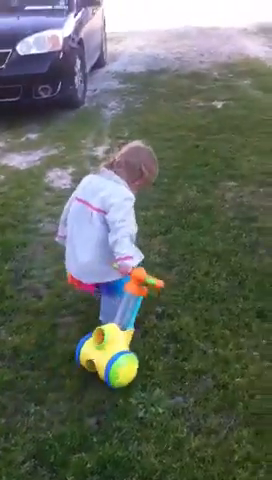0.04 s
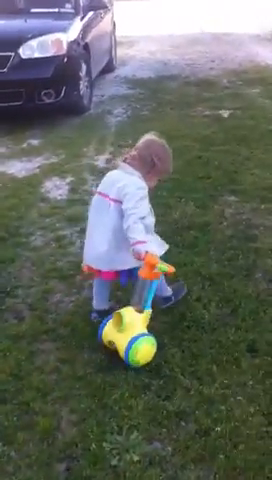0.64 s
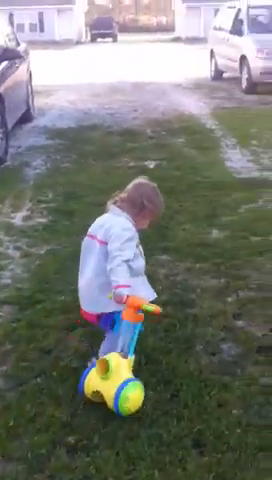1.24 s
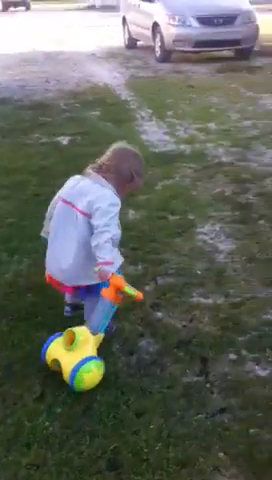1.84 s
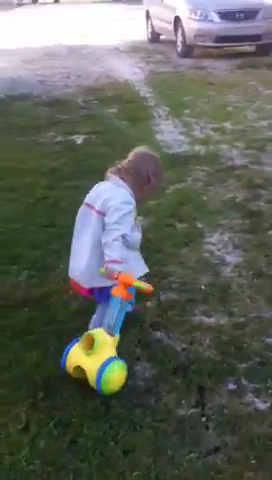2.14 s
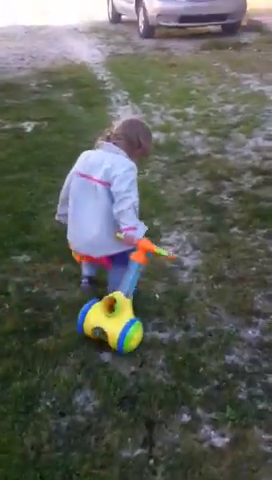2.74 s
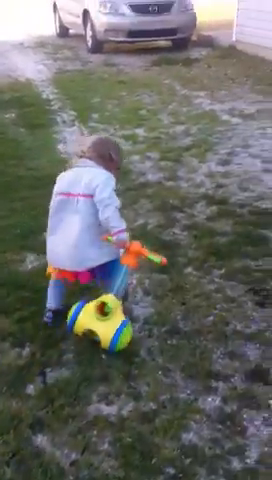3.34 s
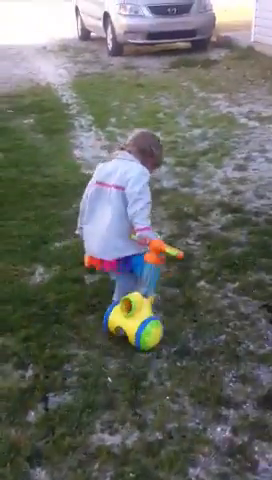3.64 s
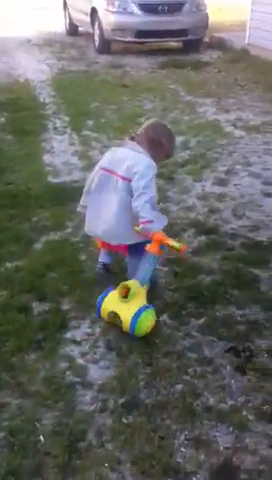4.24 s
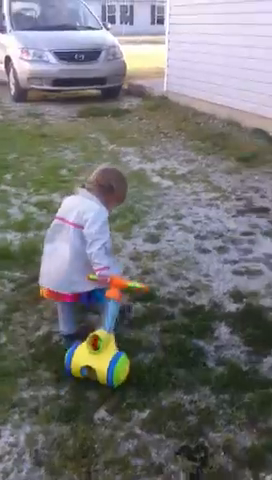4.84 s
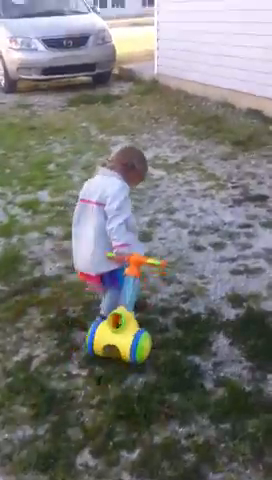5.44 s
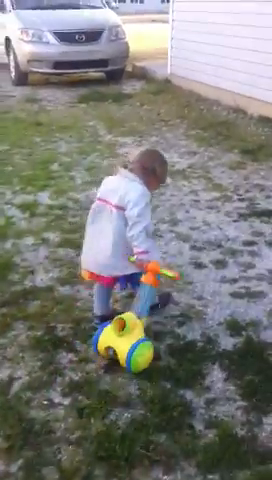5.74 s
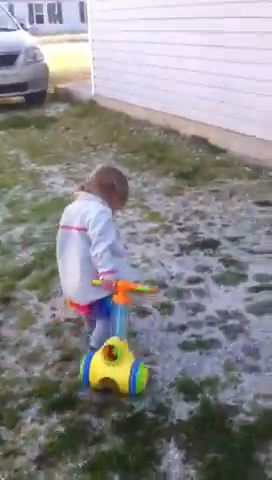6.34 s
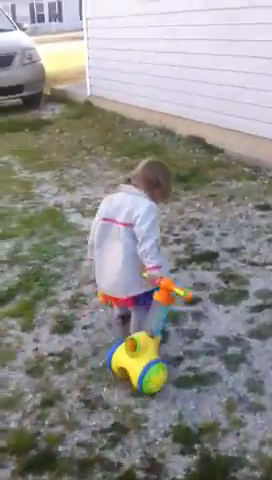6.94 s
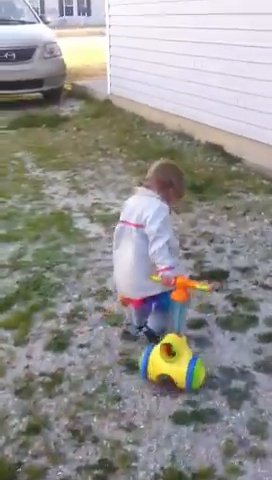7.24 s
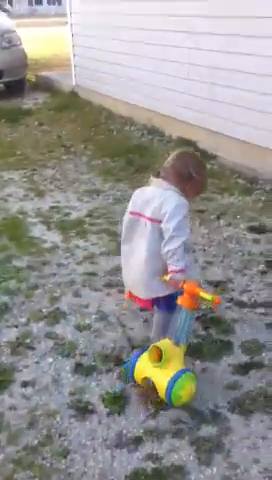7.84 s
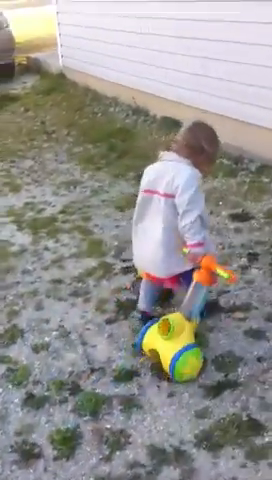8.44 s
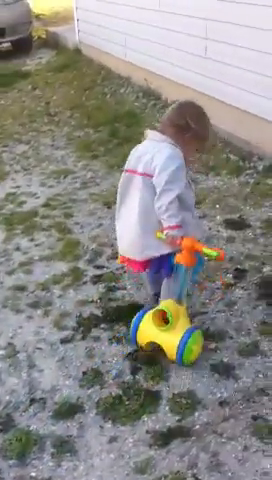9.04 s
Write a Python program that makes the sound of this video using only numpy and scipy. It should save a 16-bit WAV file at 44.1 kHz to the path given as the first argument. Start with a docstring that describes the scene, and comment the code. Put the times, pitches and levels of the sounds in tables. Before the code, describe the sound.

A toddler's plastic push toy rolls across a yard, a couple of metres away, its ratchet clicking for the whole nine seconds. The sharp clicks come in uneven runs, up to about twenty a second, and shift between bright and hollow as the drum turns. Brief pauses fall at about 0.7, 3.4, 4.1, 6.7, 7.6 and 8.5 seconds. Small, soft footsteps thud underneath, mostly in the first five seconds. A faint crackle of rolling grows slightly as grass gives way to gravel. Light crunches of stones are scattered throughout, clearest near 5.6, 6.5 and 8.2 seconds, and one pebble clacks on the plastic at about 6.6 seconds. The clicks gradually become a little hollower, with a stronger short echo from a house wall. A quiet, low drone of a distant town lies behind everything, with a hum swelling slightly around 3 seconds.

```python
"""Toddler pushing a clicking toy

A toddler rolls a plastic drum over grass and then gravel, a couple of metres away. A ratchet inside
(a catch snapping over a toothed wheel) clicks twelve times a turn, bright and hollow by turns as the
drum's open side comes round. A house wall and the yard echo it. Small feet thud, stones crunch and
one pebble clacks on the drum, over the quiet drone of a distant town."""
import sys
import numpy as np
from scipy import signal
from scipy.fft import rfft, irfft, next_fast_len
from scipy.io import wavfile
from scipy.ndimage import uniform_filter1d

SR = 44100
rng = np.random.default_rng(int(sys.argv[2]) if len(sys.argv) > 2 else 0)


def materialize(psi):
    """Save the field psi as 16-bit PCM at rate SR to the path in sys.argv[1].

    A 1-D psi becomes a single channel; in a 2-D psi each row is a channel.
    """
    bounded = np.clip(np.atleast_2d(psi).T, -1, 1)
    quanta = np.round(bounded * 32767).astype(np.int16)
    wavfile.write(sys.argv[1], SR, quanta)


N = 405279
TOP_HZ = 16000


def gain(db):
    return 10 ** (np.asarray(db) / 20)


def seconds(length):
    return np.arange(int(length * SR)) / SR


def unit_level(x):
    return x / np.sqrt(np.mean(x ** 2))


def fade(t, t60):
    """Die away by 60 dB every t60 seconds."""
    return np.exp(-np.log(1000) * t / t60)


def add(out, start_s, x):
    i = max(int(start_s * SR), 0)
    out[i:i + len(x)] += x[:max(len(out) - i, 0)]


def colour(x, tone):
    """Turn lows and highs up or down along a curve of (frequency [Hz], level [dB]) points."""
    hz, db = np.transpose(tone)
    size = next_fast_len(len(x))
    freqs = np.maximum(np.arange(size // 2 + 1) * SR / size, 1)
    curve = gain(np.interp(np.log(freqs), np.log(hz), db))
    return irfft(rfft(x, size) * curve, size)[:len(x)]


def band(x, lo_hz, hi_hz, order=2):
    return signal.sosfilt(signal.butter(order, [lo_hz, hi_hz], "band", fs=SR, output="sos"), x)


def wander(rate_hz):
    """A slow random drift, about 1 either way."""
    hold = int(SR / rate_hz)
    stairs = np.repeat(rng.standard_normal(N // hold + 1), hold)
    return unit_level(uniform_filter1d(uniform_filter1d(stairs, hold), hold)[:N])


# The tone of the distant town: (frequency [Hz], level [dB])
TOWN_TONE = [(25, -23.5), (55, -15), (75, -9.5), (105, 4), (200, 1), (450, -13), (2500, -19.5), (6000, -16),
             (10000, -25), (16000, -29)]
def town(drone_db=-61.7, hum_hz=182, hum_db=-62, hum_peak_s=2.92, hum_width_s=0.96):
    """A distant town: a low drone that wavers, a little hiss, and a hum that swells once and fades."""
    t = np.arange(N) / SR
    drone = unit_level(colour(rng.standard_normal(N), TOWN_TONE))
    drone *= gain(drone_db + np.linspace(1.3, -1.3, N) + wander(7.5))
    hum = unit_level(band(rng.standard_normal(N), hum_hz - 7, hum_hz + 7))
    swell = np.exp(-((t - hum_peak_s) / hum_width_s) ** 2)
    return drone + hum * gain(hum_db) * swell


def grains(size, density, spread_db, tone):
    """Tiny knocks at random moments, a few much bigger than the rest, high ones far more often than low."""
    out = 0
    for hz in 140 * 2. ** np.arange(7):
        strengths = gain(spread_db * np.minimum(rng.exponential(size=size), 4))
        happens = rng.random(size) < density * hz / 1000 / SR
        hits = happens * strengths * rng.choice([-1, 1], size)
        out = out + band(hits / np.sqrt(hz), hz, 2 * hz)
    return unit_level(colour(out, tone))


# The tone of the ground under the drum: (frequency [Hz], level [dB])
GROUND_TONE = [(200, 7.5), (480, -4.5), (750, 0.5), (2500, -11), (6000, -3.5), (12000, -33.5)]
def rolling(grass_db=-60.5, gravel_db=-56.5, creep=0.04, smooth_s=0.32):
    """Grass, later grit, crackles under the drum, louder when the ratchet's clicks come faster."""
    teeth = np.zeros(N)
    for start_s, _ in CLICKS:
        add(teeth, start_s, np.ones(1))
    window = int(smooth_s * SR)
    speed = unit_level(uniform_filter1d(uniform_filter1d(teeth, window), window // 2))
    grit = grains(N, density=1500, spread_db=4.2, tone=GROUND_TONE)
    return grit * (creep + speed) * gain(np.linspace(grass_db, gravel_db, N) + 1.2 * wander(13))


def struck(notes, levels_db, chatter_t60, hold_s, band_hz, detune=0, scatter_db=0, rise_s=.0002):
    """One ring for each level given: plastic chatters on plastic and sets a part's own notes ringing."""
    t, rings = seconds(.1), []
    for _ in levels_db:
        # some hits let go cleanly, others scrape a moment longer
        stretch = np.exp(0.23 * rng.standard_normal())
        chatter = rng.standard_normal(len(t)) * fade(np.maximum(t / stretch - hold_s, 0), chatter_t60)
        first_blow = 1 + gain(3) * fade(t, 0.018)
        chatter = chatter * first_blow * (1 - np.exp(-t / rise_s))
        ring = 0
        for k, (hz, width, db) in enumerate(notes):
            # each hit presses differently, so the notes can shift in pitch and strength
            shift, strength = rng.standard_normal(2)
            resonance = signal.iirpeak(hz * (1 + detune * shift), hz / width, fs=SR)
            note = signal.lfilter(*resonance, chatter)
            ring = ring + (-1) ** k * gain(db + scatter_db * strength) * note
        rings.append(ring)
    rings = band(np.array(rings), *band_hz)
    opening_level = rings[:, t < .014].std(axis=1, keepdims=True)
    return rings / opening_level * gain(levels_db)[:, None]


def turning(base_db, swing_db, cap_db, gravel_db, teeth=12, facing_tooth=6.6):
    """A part's level at each click: it swings once a turn, up to a cap, and shifts towards the gravel."""
    # 1 when the drum's open side faces the listener, -1 when it faces away
    facing = np.cos(2 * np.pi * (np.arange(len(CLICKS)) - facing_tooth) / teeth)
    progress = np.transpose(CLICKS)[0] * SR / N
    return base_db + np.minimum(swing_db * facing, cap_db) + gravel_db * (progress - .5)


# The notes of the thin tick, the catch, the wheel and the shell: (pitch [Hz], width [Hz], level [dB])
TICK_NOTES = [(9840, 490, 2.5), (11320, 960, 4), (13040, 3500, -5.5)]
CATCH_NOTES = [(5820, 330, -11), (6555, 340, -1.5), (6980, 290, -2), (7394, 250, 4.5), (8480, 350, -4.5),
               (9030, 520, -7.5)]
WHEEL_NOTES = [(4057, 235, -10.5), (4554, 144, -2), (4756, 138, 1), (5584, 260, -10)]
SHELL_NOTES = [(749, 75, -3.5), (864.3, 26, 8), (1292, 69, -4.5), (1420, 39, -0.5), (1616, 270, -5.5),
               (1820, 51, 0), (2075, 123, 1.5), (2913, 96, 1), (3088, 35.4, 8.5), (3656, 240, 3)]
# One click per tooth, in runs as the child shoves: (time [s], force against an average click [dB])
CLICKS = [(0.0507, 0.5), (0.1447, 1.5), (0.2722, -2.0), (0.4557, 1.0), (0.517, 0.5), (0.5801, -1.0),
          (0.6519, 0.5), (1.0125, 1.5), (1.0645, 0.5), (1.116, 1.0), (1.1634, -2.5), (1.2175, -2.0),
          (1.339, 0.0), (1.4984, 1.5), (1.5904, -3.0), (1.8296, 2.5), (1.8978, -1.5), (1.969, -2.5),
          (2.0595, -0.5), (2.1907, -2.0), (2.3877, 1.5), (2.427, 0.5), (2.4717, 1.5), (2.5329, -2.0),
          (2.6185, -2.0), (2.762, 1.5), (2.85, -1.0), (2.888, 3.0), (2.928, 1.5), (2.9726, 0.0),
          (3.0184, 1.0), (3.0682, 2.0), (3.1762, 0.0), (3.2542, 1.5), (3.2929, 0.5), (3.3532, 0.5),
          (3.636, 1.0), (3.6897, 1.5), (3.749, -2.0), (3.797, 3.0), (3.8498, -0.5), (3.941, -1.0),
          (4.011, 0.5), (4.0786, 1.5), (4.365, 0.0), (4.4089, -1.5), (4.4598, 0.0), (4.5219, -2.0),
          (4.6026, -2.0), (4.7264, 2.0), (4.822, 1.0), (4.9997, 1.5), (5.1885, 0.0), (5.256, -2.0),
          (5.3181, 0.5), (5.3941, 0.0), (5.5588, -1.5), (5.6849, 0.5), (5.7533, 1.0), (5.9862, -3.0),
          (6.0876, 0.0), (6.1489, 2.0), (6.2189, -2.5), (6.2847, -1.0), (6.3563, -2.0), (6.5036, -1.5),
          (6.6038, -0.5), (6.6708, 0.0), (6.9642, -0.5), (7.0473, -1.0), (7.102, 0.0), (7.156, -0.5),
          (7.2083, -1.0), (7.2698, -0.5), (7.3439, -2.5), (7.3991, 1.0), (7.4483, 0.5), (7.5256, -2.0),
          (7.8632, -0.5), (7.9901, 2.5), (8.071, 2.0), (8.1229, 0.0), (8.2004, 0.5), (8.252, -1.0),
          (8.3071, 2.5), (8.4009, 1.0), (8.9064, -1.5), (8.9805, 2.0), (9.061, 0.5), (9.131, 0.0)]
def ratchet(tick_share=.3):
    """The catch snaps off a tooth with a thin tick; the wheel and the drum's shell ring a little longer."""
    force_db = np.transpose(CLICKS)[1]
    # catch and wheel are loudest through the open side, the hollow shell from the closed side
    tick_db = tick_share * force_db + turning(base_db=-41.9, swing_db=2.1, cap_db=2.1, gravel_db=.9)
    catch_db = force_db + turning(base_db=-29.6, swing_db=5.9, cap_db=1.7, gravel_db=-.3)
    wheel_db = force_db + turning(base_db=-35.9, swing_db=6.9, cap_db=4.9, gravel_db=5.7)
    shell_db = turning(base_db=-42.3, swing_db=-3.2, cap_db=2.2, gravel_db=6.4)
    tick = struck(TICK_NOTES, tick_db, chatter_t60=0.024, hold_s=0.0029, band_hz=(9050, 17000),
                  scatter_db=1.5)
    catch = struck(CATCH_NOTES, catch_db, chatter_t60=0.024, hold_s=0.0034, band_hz=(5100, 10440),
                   detune=0.011, scatter_db=1.5)
    wheel = struck(WHEEL_NOTES, wheel_db, chatter_t60=0.039, hold_s=0.0033, band_hz=(3630, 5940),
                   detune=0.012, scatter_db=2.5)
    shell = struck(SHELL_NOTES, shell_db, chatter_t60=0.061, hold_s=0.0015, band_hz=(574, 4300))
    return tick + catch + wheel + shell


# The wall's echo as the child nears it: (first delay [s], last delay [s], first level [dB], last level [dB])
WALL_ECHO = (.024, .007, -20.5, -10)
# A weaker echo from across the yard: (delay [s], level [dB])
FAR_ECHO = (.044, -24)
# The tone of the yard's soft wash of echoes: (frequency [Hz], level [dB])
YARD_TONE = [(700, -18.5), (2200, -11), (3400, -12.5), (4700, 1), (5600, -4), (7400, 1.5), (10000, -13.5),
             (16000, -24.5)]
def clicks_in_yard(clicks):
    """Each click is heard directly, then bounces back from the house wall and the yard."""
    out, t = np.zeros(N), seconds(.4)
    first_delay, last_delay, first_db, last_db = WALL_ECHO
    far_delay, far_db = FAR_ECHO
    wash_shape = (fade(t, 0.16) + gain(-24) * fade(t, 0.69)) * (1 - np.exp(-t / 0.0044))
    for (start_s, _), click in zip(CLICKS, clicks):
        progress = start_s * SR / N
        add(out, start_s, click)
        wash = colour(rng.standard_normal(len(t)), YARD_TONE) * wash_shape
        wash *= np.linalg.norm(click) / np.linalg.norm(wash)
        add(out, start_s, gain(-19.3 + 10 * progress) * wash)  # stronger close to the house
        # the wall's overlapping boards blur the echo
        boards = rng.standard_normal(len(click)) * fade(t[:len(click)], 0.023)
        echo = signal.fftconvolve(click, boards / np.linalg.norm(boards))
        wall_delay = first_delay + progress * (last_delay - first_delay)
        wall_db = first_db + progress * (last_db - first_db)
        add(out, start_s + wall_delay, gain(wall_db) * echo)
        add(out, start_s + far_delay, gain(far_db) * echo)
    return out


# The child's steps: (time [s], heaviness [dB])
FOOTSTEPS = [(.428, -43), (.62, -48), (.802, -44.5), (1.051, -45), (1.641, -50), (1.755, -47.5),
             (2.259, -44.5), (2.639, -42.5), (2.876, -48.5), (2.993, -46.5), (3.158, -48.5), (3.875, -46),
             (4.146, -42.5), (4.8, -48.5), (6.135, -52), (7.633, -51.5), (8.593, -49), (9.15, -50)]
def footsteps(thud_hz=145, thud_t60=0.064, knock_hz=520, landing_s=.011, brush_t60=0.1):
    """A sole brushes the ground, and the weight lands with a dull thud and a short knock."""
    out, t = np.zeros(N), seconds(.16)
    soft_start = (1 - np.exp(-t / 0.002)) ** 2
    press = fade(t, brush_t60) * (1 - np.exp(-t / .01)) ** 2
    for start_s, weight_db in FOOTSTEPS:
        thud_tuning, knock_tuning = np.exp(.12 * rng.standard_normal(2))
        thud = np.sin(2 * np.pi * thud_hz * thud_tuning * t) * fade(t, thud_t60) * soft_start
        knock = np.sin(2 * np.pi * knock_hz * knock_tuning * t) * fade(t, 0.0023)
        brush = band(rng.standard_normal(len(t)), 77, 343) * press
        add(out, start_s, gain(weight_db - 13.5) * unit_level(brush))
        add(out, start_s, gain(weight_db - 9.5) * unit_level(thud))
        add(out, start_s + landing_s, gain(weight_db - 17) * unit_level(knock))
    return band(out, 108, TOP_HZ, order=3)  # the deepest bass is cut away below the steps


# The tone of a crunch: (frequency [Hz], level [dB])
CRUNCH_TONE = [(200, 8), (480, 6), (700, 9.5), (1500, -1), (2600, -5), (8000, -20)]
# Patches of loose stones being pressed: (time [s], strength [dB])
CRUNCHES = [(.69, -62), (.802, -57), (1.051, -53), (2.255, -56), (2.633, -51), (3.98, -53.5),
            (5.636, -48.5), (5.87, -63), (6.26, -57), (6.503, -45.5), (6.86, -51.5), (7.355, -56),
            (7.81, -60), (8.168, -49.5), (8.525, -61), (8.58, -61), (9.09, -53), (9.14, -51)]
def stones(crunch_t60=0.16, press_s=.01):
    """Loose stones grind together as weight comes onto them."""
    out, t = np.zeros(N), seconds(.16)
    press = fade(t, crunch_t60) * (1 - np.exp(-t / press_s)) ** 2
    for start_s, strength_db in CRUNCHES:
        crunch = grains(len(t), density=700, spread_db=4, tone=CRUNCH_TONE) * press
        add(out, start_s, gain(strength_db - 3) * unit_level(crunch))
    return band(out, 120, TOP_HZ, order=3)


# A pebble hitting the drum: (time [s], level [dB])
PEBBLE_CLACK = (6.565, -43)
def pebble():
    """One stone hits the plastic, which rings briefly."""
    out = np.zeros(N)
    start_s, level_db = PEBBLE_CLACK
    clack = struck(WHEEL_NOTES + CATCH_NOTES, [level_db], chatter_t60=.04, hold_s=.004,
                   band_hz=(2000, 8000), detune=.03, scatter_db=2)[0]
    add(out, start_s, clack)
    return out


def scene():
    """The toy, the child's feet and the ground under both, over the distant town."""
    return (clicks_in_yard(ratchet()) + pebble() + footsteps() + stones() + rolling() + town())[None]


def record(dry):
    """A phone cuts off the very highest treble."""
    return signal.sosfilt(signal.ellip(8, .2, 70, TOP_HZ, fs=SR, output="sos"), dry)


dry = scene()
out = record(dry)
materialize(out)
```